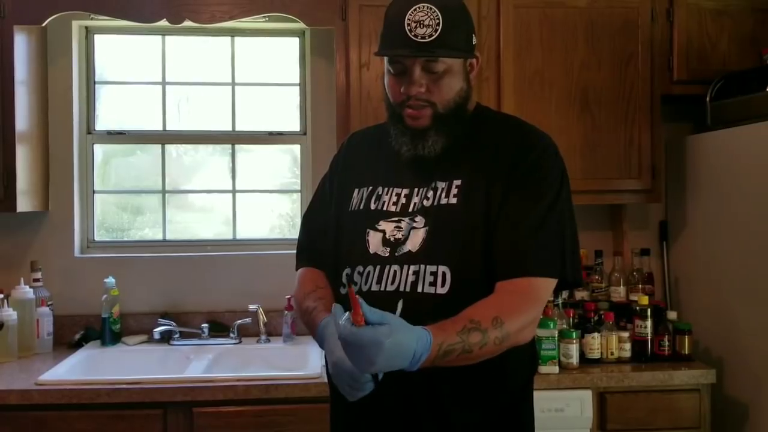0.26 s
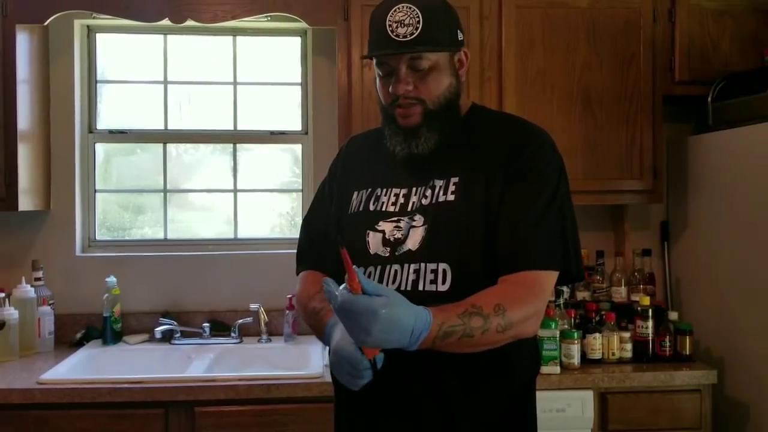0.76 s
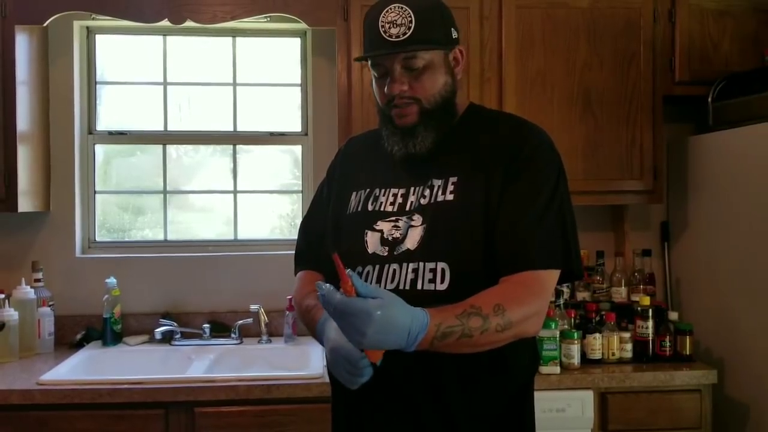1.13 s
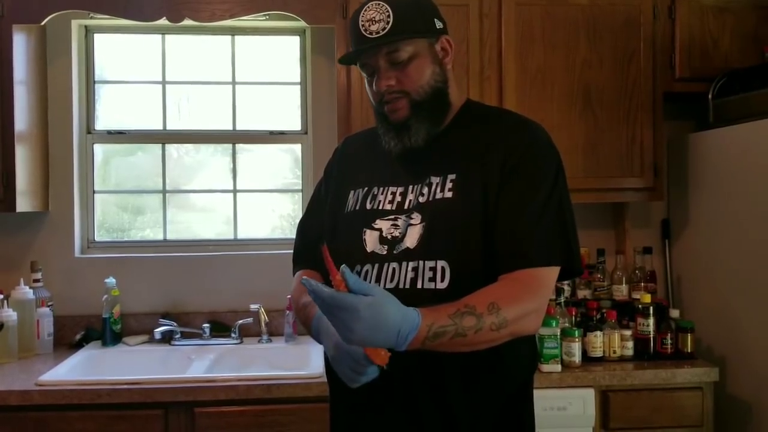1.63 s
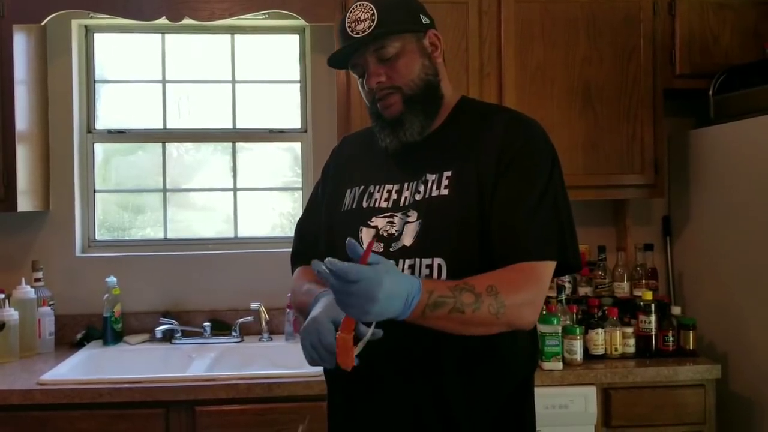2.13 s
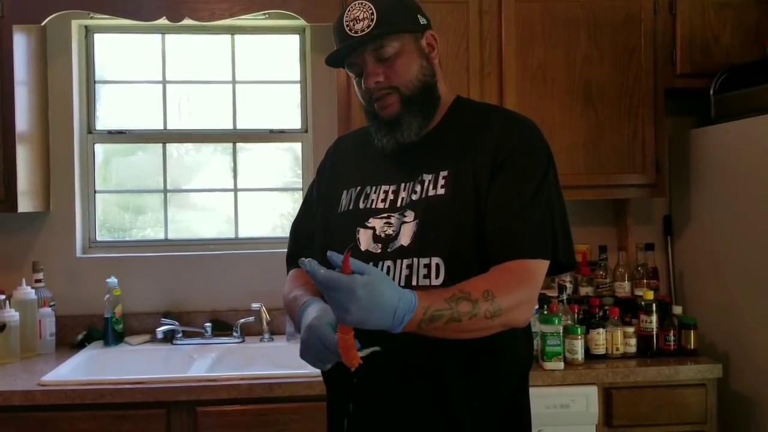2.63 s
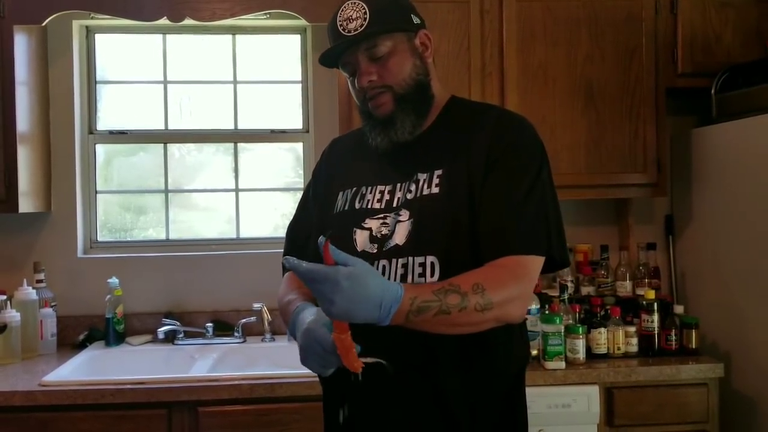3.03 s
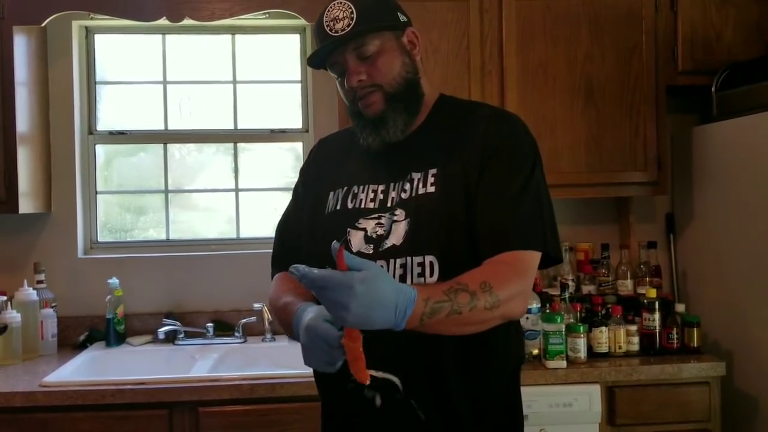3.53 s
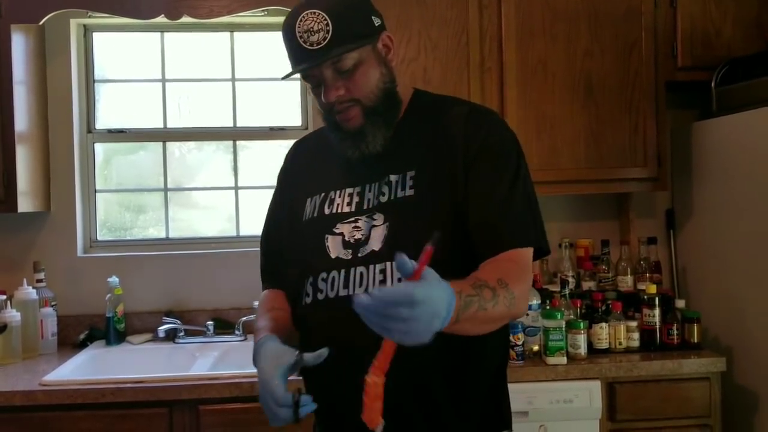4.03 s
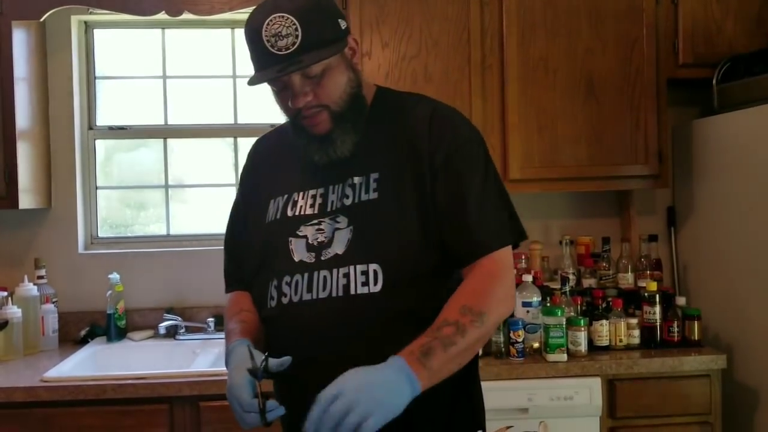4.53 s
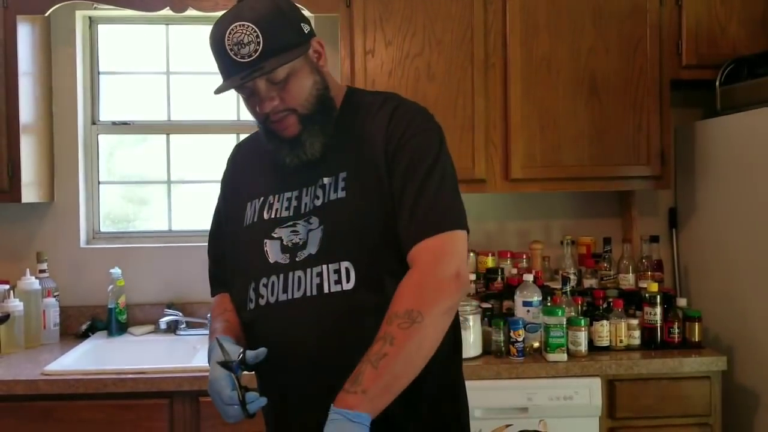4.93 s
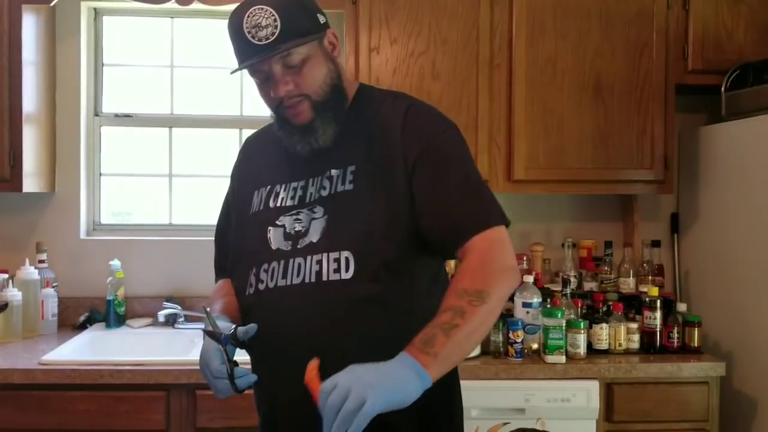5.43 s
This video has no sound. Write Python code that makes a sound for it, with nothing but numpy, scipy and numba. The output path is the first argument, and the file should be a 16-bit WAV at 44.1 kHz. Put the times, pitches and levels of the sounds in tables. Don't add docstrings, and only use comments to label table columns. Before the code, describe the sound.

A small, hard-walled kitchen with a quiet low fridge hum and faint hiss, heard in stereo from a few steps away. At first only soft glove rubbing and small ticks at about 0.3 and 0.6 s. A tearing crack comes at 0.84 s, then a bright, splintery grinding run from 1.07 to 1.17 s. Strong snaps follow at 1.57, 1.64 and 1.82 s, with gritty crunching between. A lower-pitched snap lands at 2.34 s, then lighter ticks and creaks until 3.1 s. Cracks thicken from 3.2 s, with brief hollow squeaks, peaking in a dense, loud cluster at 3.58 to 3.65 s; a last heavy bite falls at 3.88 s. After a near pause, a loud woody knock with a clatter hits the counter at 4.42 s. Pieces rattle and rock around 4.8 to 5.1 s, tap lightly near 5.3 s, and a final thud at 5.49 s fades into the hum.

```python
import sys
import numpy as np
from scipy import signal
from scipy.fft import rfft, irfft
from scipy.io import wavfile
from scipy.ndimage import uniform_filter1d
from numba import njit

SR = 44100
rng = np.random.default_rng(int(sys.argv[2]) if len(sys.argv) > 2 else 0)


def gain_from_db(level_db):
    decades = np.asarray(level_db, float) / 20
    return 10 ** decades


def store_pcm(level_fs):
    pcm = np.round(np.clip(level_fs, -1, 1) * 32767).astype(np.int16)
    wavfile.write(sys.argv[1], SR, np.atleast_2d(pcm).T)


N = 250488
T = np.arange(N) / SR
LEAD = 128
PLACES = 4

# (f/Hz, width/Hz, level/dB)
COUNTER = [(125, 86, -14), (204, 330, -0.5), (360, 240, 0.5), (426, 61, 9.5), (645, 35, 4), (832, 130, 4.5),
           (1250, 250, 0.5), (1543, 160, 3), (2050, 870, -9.5)]
# (f/Hz, density/dB)
TREBLE = [(2940, -29), (5000, -2.5), (5630, -3.5), (7170, -2), (8910, -7.5), (10600, -6.5), (12200, -4.5),
          (13900, -1), (14900, -4), (15500, -65)]


def unit(x):
    return x / np.sqrt(np.mean(x ** 2) + 1e-30)


def peak(x, db):
    return x * gain_from_db(db) / np.sqrt(uniform_filter1d(x ** 2, 128).max())


def add(out, s, x):
    i = int(s * SR) - LEAD
    out[i:i + len(x)] += x[:N - i]


def on_log(table, size):
    hz, value = np.transpose(table)
    return np.interp(np.log(np.fft.rfftfreq(size, 1 / SR) + 1), np.log(hz), value)


def colour(x, table):
    size = x.shape[-1]
    return irfft(rfft(x) * gain_from_db(on_log(table, size)), size)


def diffuse(size):
    # (f/Hz, correlation)
    alike = [(60, 0.84), (300, 0.8), (640, 0.47), (1400, 0), (15000, 0.21)]
    c = np.clip(on_log(alike, size), 0, 1)
    mid, side = rfft(rng.standard_normal((2, size)))
    mid = mid * np.sqrt((1 + c) / 2)
    side = side * np.sqrt((1 - c) / 2)
    return irfft(np.array([mid + side, mid - side]), size)


@njit
def svf(x, hz, q):
    y, b, l = np.empty(len(x)), 0., 0.
    for i in range(len(x)):
        g = np.tan(np.pi * hz[i] / SR)
        v = (b + g * (x[i] - l)) / (1 + g * (g + 1 / q))
        b, l, y[i] = 2 * v - b, l + 2 * g * v, v / q
    return y


def ring(x, hz, width_hz):
    return svf(x, np.full(len(x), 1. * hz), hz / width_hz)


def body(x, modes):
    return sum((-1) ** k * gain_from_db(db) * ring(x, hz, w) for k, (hz, w, db) in enumerate(modes))


def regrip(modes, spread):
    shifts = rng.standard_normal(len(modes)).clip(-2, 2)
    return [(hz * (1 + spread * shift), w, db) for (hz, w, db), shift in zip(modes, shifts)]


def swells(rows):
    t = T[::64]
    gain = 0
    for s, db, up, down in rows:
        gain = gain + gain_from_db(db) * np.exp(-np.abs(t - s) / np.where(t < s, up, down).clip(.002))
    return np.interp(T, t, gain)


def fractures(size, rate, spread_db):
    hit, big, sign = rng.random((3, size))
    return (hit < rate / SR) * gain_from_db(-spread_db * np.log(big + 1e-4)) * np.sign(sign - .5)


def burst(length_s, rate=14000, rise=0.72, brittle_s=0.0025):
    t = np.clip(np.arange(4096) - LEAD, 0, None) / SR / np.clip(length_s, .0003, .025)
    x = 0.38 * fractures(4096, rate, 3.7) * np.exp(-t) * (1 - np.exp(-t / rise))
    x[LEAD] += np.exp(-length_s / brittle_s)
    x = rfft(x)
    return irfft(x / np.sqrt(uniform_filter1d(np.abs(x) ** 2, size=40) + 1e-12))


def cracks():
    # (t/s, peak level/dB, shell resonance f/Hz, treble level/dB, low level/dB)
    snaps = [
        (1.0714, -30, 3730, 10.5, -35),
        (1.5699, -19, 3400, 2.5, -1.5),
        (1.6386, -19.5, 1150, -6.5, 1),
        (1.8221, -17, 2450, 1.5, 2.5),
        (2.3429, -21.5, 1090, -3.5, -23),
        (3.2715, -22.5, 1380, -24, -6),
        (3.581, -19.5, 2280, -1.5, -40),
        (3.596, -16.5, 2360, 0, -37),
        (3.878, -24, 2830, -8, 13.5),
    ]
    ticks = [(0.3322, -41.5, 1850, -12, 14), (0.596, -33.5, 4100, -8, -20.5), (0.626, -33, 3060, 8, -16),
             (0.6536, -31.5, 1530, -19, -22), (1.531, -34, 1810, -8, -9), (2.003, -42, 1530, 7.5, -20),
             (2.056, -39, 980, 1.5, 15), (2.2397, -48, 2160, 3.5, 13), (2.272, -41.5, 5060, 9.5, 14.5),
             (2.3109, -47, 1590, 12, 23), (2.493, -34.5, 765, -47, -20), (2.592, -39.5, 5230, 1, -20),
             (2.629, -37, 4830, -25, -7), (2.8526, -33.5, 4380, -5.5, 6), (3.0585, -35.5, 1160, -10, 7),
             (3.647, -17, 4900, -2, -20), (3.812, -37.5, 3430, -16.5, -21), (4.773, -51, 1500, 9, -3)]
    # (t/s, peak level/dB, f/Hz, treble level/dB)
    splinters = [
        (1.1237, -29, 3900, 4.5),
        (2.3431, -28, 3640, -15),
        (3.271, -36, 3170, -40),
        (3.281, -41, 3250, -28),
    ]
    tears = [(0.8339, -23, 3620, 4, 4.5), (0.8427, -23.5, 2540, 8.5, 6.5), (1.3393, -31.5, 3070, 1.5, 4),
             (1.5774, -28, 1250, 6, -30), (1.8338, -23.5, 3480, 3, 10), (1.8533, -23, 1500, -3.5, -32),
             (2.0292, -42.5, 1710, 6.5, 12), (2.9307, -46, 1870, -24, 21.5), (3.126, -33, 1150, -6.5, -21),
             (3.2993, -30.5, 3340, 2.5, 11.5), (3.4785, -37, 2340, -1, 14), (3.6394, -16, 2300, 1, -16)]
    # (t/s, peak level/dB, f/Hz, treble level/dB, tearing time/s)
    grinds = [(1.0888, -28, 3400, 4.5, 0.031), (1.1105, -30, 4260, -2, 0.012),
              (1.1346, -26.5, 2300, -8, 0.0065), (1.318, -33.5, 1780, -3.5, 0.012),
              (1.5449, -37, 1250, 3.5, 0.0084), (2.841, -41.5, 1490, -8, 0.0071),
              (2.3556, -31.5, 2640, -8, 0.0096), (2.6624, -39.5, 2600, 5, 0.0068),
              (2.706, -37.5, 3580, -0.5, 0.0075), (2.955, -41, 2300, 3.5, 0.016),
              (3.1733, -32, 2050, -2.5, 0.0031), (3.2757, -28, 1430, -22, 0.0058),
              (3.348, -32.5, 2340, -1, 0.0091), (3.499, -37, 2600, 1.5, 0.0054),
              (3.6143, -27.5, 1900, 5.5, 0.0054), (3.631, -32, 2190, -13, 0.015)]
    # (f/Hz, width/Hz, level/dB)
    leg_modes = [(1250, 270, -12), (2300, 125, 0.5), (3920, 260, -20), (5410, 220, -5)]
    snap_s, tick_s, splinter_s, tear_s = 0.0012, 0.0015, 0.0012, 0.0036
    thin_low_db = -36

    quick = sorted([(*c, snap_s) for c in snaps] + [(*c, tick_s) for c in ticks])
    quick += [(*c, thin_low_db, splinter_s) for c in splinters]
    slow = [(*c, tear_s) for c in tears] + [(*c[:4], thin_low_db, c[4]) for c in grinds]
    out = np.zeros((PLACES, N))
    for k, (s, db, hz, treble_db, low_db, length_s) in enumerate(quick + slow):
        x = burst(length_s)
        piece = ring(ring(x, hz, 0.5 * hz), hz, 0.66 * hz)
        leg = gain_from_db(5.5) * body(x, regrip(leg_modes, 0.173))
        leg = leg + gain_from_db(-4.0) * ring(ring(x, 2470, 4640), 2470, 4640)
        shell = peak(piece, 0) + peak(leg, 4.0 + 0.5 * treble_db)
        spray = colour(x, TREBLE)
        low = ring(ring(x, 1110, 1470), 550, 2200)
        place = k % 2 + 2 * (k >= len(quick))
        add(out[place], s, peak(shell, db) + peak(spray, db + treble_db) + peak(low, db + low_db - 13.0))
    return out


def blows():
    # (t/s, peak level/dB, f/Hz, sharpness Q)
    hard_blows = [(0.628, -35, 5500, 1.5), (0.85, -29.5, 960, 4.5), (0.86, -23.5, 1650, 4),
                  (0.8455, -25, 2700, 3.7), (1.085, -21.5, 5000, 0.92), (1.127, -20, 2200, 1.2),
                  (1.135, -23, 1800, 1.5), (1.153, -26, 2000, 4), (1.17, -26, 1800, 2),
                  (1.569, -24, 950, 3.9), (1.575, -20, 1280, 6.3), (1.639, -32, 1050, 4.1),
                  (1.646, -26, 1270, 3.3), (1.833, -18.5, 7200, 3), (1.859, -23, 1510, 4.3),
                  (2.3425, -18, 1040, 2.8), (2.343, -23, 2300, 7), (2.3435, -19.5, 3440, 6.3),
                  (2.344, -21, 4300, 5.1), (2.348, -21.5, 1520, 5.5), (3.272, -20, 3260, 4.4),
                  (3.2795, -21, 3200, 4.9), (3.301, -24, 3100, 1.1), (3.272, -29, 1500, 4),
                  (3.279, -28, 1450, 5.4), (3.187, -32, 2300, 9), (3.204, -34, 2250, 9),
                  (3.379, -27, 2520, 9.9), (3.41, -29, 2350, 9), (3.598, -16, 2070, 1.8),
                  (3.6515, -22, 4730, 1.5), (3.644, -29, 2450, 4), (3.8782, -27, 960, 2),
                  (3.88, -22.5, 1900, 1.6), (4.4265, -15, 810, 4.2), (4.426, -26.5, 170, 1.3),
                  (4.4113, -29, 1300, 1.1), (4.4245, -11, 463, 7.6), (4.426, -13, 2650, 7),
                  (4.424, -12.5, 1700, 8), (4.844, -17, 5950, 1.9), (4.9413, -33, 830, 1.5),
                  (5.2865, -40, 895, 2.5), (5.4893, -18, 370, 0.98), (5.49, -19, 1100, 2),
                  (5.4895, -18.5, 345, 2.8), (5.506, -28, 330, 2.7), (5.4977, -21, 320, 1.9),
                  (5.4935, -20.5, 1850, 3.6), (5.497, -23, 1140, 6.9)]
    more_blows = [(4.448, -18, 2050, 6.1), (4.47, -21, 464, 6), (4.8345, -20.5, 970, 3.5), (4.836, -25.5, 450, 5),
                  (4.8427, -27, 1140, 4), (4.9434, -31, 900, 3.5), (4.96, -27, 425, 4), (5.026, -35, 407, 4),
                  (5.352, -36, 480, 5.7), (5.369, -27.5, 477, 7), (5.063, -38, 900, 3)]
    out = np.zeros(N)
    jolt = 1. * (np.arange(2048) == LEAD)
    for s, db, hz, q in hard_blows + more_blows:
        width_hz = hz / np.clip(q, .5, 20)
        add(out, s, peak(ring(ring(jolt, hz, width_hz), hz, width_hz), db))
    return out


def crunch():
    # (t/s, crunch level/dB, treble over crunch level/dB, fade/s)
    bites = [(0.0, -49.5, 3, 0.017), (0.04, -63.5, 5.5, 0.63), (0.342, -58, 7, 0.045),
             (0.603, -38, -50, 0.028), (1.082, -32, -12, 0.048), (1.13, -47, 11.5, 0.036),
             (2.679, -42.5, 4.5, 0.039), (2.89, -54, -30, 0.049), (2.93, -49.5, 0, 0.081),
             (3.28, -49.5, 12.5, 0.039), (3.38, -36, 1.5, 0.027), (3.5, -56, 9, 0.047),
             (3.6, -50, 0, 0.043), (3.882, -36.5, -16, 0.029)]
    # (t/s, crunch level/dB, treble over crunch level/dB, swell/s, fade/s)
    rubs = [(0.98, -44, -1.5, 0.026, 0.053), (1.3, -50.5, -20.5, 0.11, 0.026), (1.51, -56, -7, 0.52, .12),
            (1.68, -52, -16, 0.11, 0.059), (1.98, -56.5, 0.5, 0.33, 0.083),
            (2.32, -45.5, 0.5, 0.031, 0.053), (2.45, -50, -23, 0.13, 0.08), (2.83, -53, -4, 0.2, 0.017),
            (3.188, -35, 0, 0.028, 0.01), (3.55, -47.5, -11, 0.11, 0.085), (3.82, -46.5, -3, .12, 0.054),
            (4.15, -60, -5.5, 0.048, 0.027), (4.368, -68, 19.5, 0.032, 0.0063)]
    # (t/s, level/dB, f/Hz, swell/s, fade/s)
    hollows = [(0.34, -43.5, 2020, 0.026, 0.17), (0.6, -68.5, 3090, 0.0098, 0.054),
               (0.839, -101.5, 2960, .006, 0.04), (1.13, -23, 2530, 0.011, 0.045),
               (1.33, -57, 2580, .03, 0.028), (1.57, -26, 3200, 0.012, 0.052),
               (1.68, -28.5, 2640, 0.062, 0.017), (1.84, -47, 2690, 0.1, 0.25),
               (2.35, -49, 3170, 0.027, 0.085), (2.45, -51, 2250, 0.091, 0.055),
               (2.68, -48, 2850, .04, 0.06), (2.85, -35, 2980, .005, 0.0072),
               (2.93, -36, 1970, 0.015, 0.027), (3.19, -22.5, 2190, 0.034, 0.0078),
               (3.28, -16, 3080, 0.014, 0.02), (3.38, -19, 2140, 0.014, 0.019),
               (3.5, -37, 2570, .011, .023), (3.6, -3, 2070, 0.0053, 0.019)]
    # (t/s, level/dB, swell/s, fade/s)
    glides = [
        (0.03, -58.5, 0.07, 0.096),
        (0.14, -56.5, 0.11, 0.046),
    ]
    # (f/Hz, width/Hz, level/dB)
    glove = [(2500, 500, 0), (4330, 300, 2)]

    bite_s = 0.0038
    work = [(s, db, rel, bite_s, fade) for s, db, rel, fade in bites] + rubs
    x = fractures(N, 6000, 2.8)

    s, _, hz = np.transpose(hollows)[:3]
    hz = np.interp(T, s, hz)
    hollow = unit(svf(svf(x, hz, 1.8), hz, 1.7))
    hollow = swells([(s, db - 18.0, up, down) for s, db, _, up, down in hollows]) * hollow

    broad = unit(ring(ring(x, 1750, 3900), 1750, 5200))
    broad = swells([(s, db - 2.0, up, down) for s, db, _, up, down in work]) * broad
    hiss = swells(glides) * unit(body(x[::-1].copy(), glove))
    treble = swells([(s, db + rel, up, down) for s, db, rel, up, down in work]) * unit(colour(x, TREBLE))
    return hollow + broad + hiss + treble


def patches(rows, q, grains):
    out = np.zeros(N)
    before = 3072
    t = (np.arange(8192) - before) / SR
    for s, db, hz, up, down in rows:
        i = int(s * SR) - before
        swell = np.exp(-np.abs(t) / np.where(t < 0, up / 2, down).clip(.0003, .03))
        x = grains[i:i + len(t)] * swell[:N - i]
        out[i:i + len(x)] += peak(ring(ring(x, hz, hz / q), hz, hz / q), db)
    return out


def squeaks():
    # (t/s, level/dB, f/Hz, swell/s, fade/s)
    walls = [(1.808, -41, 1250, 0.026, 0.02), (2.415, -42.5, 2150, 0.022, 0.033),
             (2.71, -44, 3550, .005, .03), (2.52, -53, 2800, 0.027, 0.024), (3.08, -44, 1830, .004, 0.0085),
             (0.345, -48, 1670, .006, 0.012), (2.61, -56, 2850, .03, .03), (3.129, -41, 1150, 0.0028, .006),
             (3.138, -37, 1850, 0.0037, 0.006), (3.19, -34, 2300, 0.043, 0.011),
             (3.195, -42, 4200, 0.024, .015), (3.277, -38, 1450, .003, 0.0066),
             (3.378, -32, 2530, .004, .012), (3.395, -35.5, 2340, .01, .012),
             (3.412, -46, 2450, .006, 0.013), (3.565, -39, 2580, .004, 0.0056),
             (3.6, -30, 2300, 0.0033, 0.0078), (3.612, -32, 2560, .008, .015),
             (3.63, -44, 2250, .01, 0.009), (3.645, -41, 2300, .006, 0.016), (3.65, -36, 4800, .01, .025),
             (3.6, -24.5, 4770, .003, .01), (3.815, -44, 3500, .002, .004)]
    chips = [(3.28, -26.5, 3250, 0.00088, .004), (3.3, -38, 3500, .002, 0.0027),
             (3.879, -37, 1510, 0.00039, 0.0038), (3.88, -32, 3560, .0005, 0.0021),
             (4.823, -35, 1990, 0.0011, 0.0026), (4.836, -32, 1040, 0.0013, 0.0043),
             (4.844, -39, 2780, .002, 0.0034), (4.846, -40, 1090, .002, 0.0046),
             (4.447, -23, 1890, 0.0032, .006), (5.365, -49, 2490, .006, .01), (5.405, -50, 1900, .006, .01),
             (5.503, -42, 1130, 0.0025, 0.0053), (5.495, -36, 1900, .001, 0.0049)]
    rocks = [(4.855, -40, 263, .01, .01), (4.878, -44, 620, 0.0065, .01), (4.91, -36, 620, .006, .015),
             (4.93, -39, 437, 0.012, .01), (4.945, -35, 880, .003, 0.014), (4.962, -42, 440, 0.0056, 0.019),
             (4.99, -49, 750, .01, 0.018), (5.025, -49, 483, .006, 0.0072),
             (5.066, -42, 380, 0.0065, 0.009), (5.325, -50, 700, .005, .01),
             (5.385, -42, 480, 0.006, 0.016), (5.39, -45, 453, .005, 0.012), (5.415, -41, 402, .008, 0.016),
             (5.442, -41.5, 500, 0.011, 0.013), (5.54, -33, 500, 0.008, 0.0071)]
    x = fractures(N, 9000, 2.5)
    return patches(walls, 6, x) + patches(chips, 1.95, x[::-1].copy()) + patches(rocks, 2.1, x)


def drops():
    # (t/s, peak level/dB, knock f/Hz, click level/dB, treble level/dB)
    knocks = [(4.424, -11, 441, -3, -25), (4.831, -22.5, 224, 3.5, 1.5), (4.94, -26.5, 704, -13, -17),
              (5.033, -43, 980, -5, -30), (5.062, -39, 1000, -18, -36), (5.098, -34, 970, -6.5, -17),
              (5.286, -39.5, 360, -29, -14), (5.318, -35.5, 503, -33, -15), (5.352, -31.5, 480, -50, -12.5),
              (5.394, -38, 480, -15, -20), (5.4903, -16.5, 323, -5.5, -4.5)]
    tumbles = [(4.41, -19, 500, -7, -6.5), (4.427, -17.5, 468, -14, -10), (4.425, -14.5, 1910, -4, -15),
               (4.445, -26, 1980, -11, -23), (4.469, -22.5, 360, -22, -29), (4.821, -33, 470, -17, -13),
               (4.845, -27.5, 215, -27, -21), (4.899, -31, 527, -13, -20), (4.954, -34, 388, -22, -16),
               (5.37, -47, 490, -7, -31), (5.418, -39, 394, -31, -19), (5.492, -22.5, 1170, -3.5, -15),
               (4.941, -29.5, 1080, -8.5, -16), (4.962, -38, 960, -18, -23), (5.351, -32.5, 204, -36, -28),
               (5.434, -51, 880, -3, -27)]
    knock_s, tumble_s = 0.0012, 0.0053
    out = np.zeros((PLACES, N))
    for k, (s, db, hz, click_db, treble_db) in enumerate(knocks + tumbles):
        tumbling = k >= len(knocks)
        x = burst(tumble_s if tumbling else knock_s)
        top = body(x, regrip(COUNTER, .02))
        knock = peak(ring(ring(x, hz, 0.14 * hz), hz, 1.1 * hz), 0) + peak(top, 3.0 + 0.35 * click_db)
        click = ring(ring(x, 1700, 2700), 4100, 4500)
        spray = colour(x, TREBLE)
        hit = peak(knock, db) + peak(click, db + click_db) + peak(spray, db + treble_db)
        add(out[k % 2 + 2 * tumbling], s, hit)
    return out


def shuffle():
    # (t/s, rumble level/dB, scratch over rumble level/dB, swell/s, fade/s)
    slides = [(4.37, -70, 14, 0.061, 0.02), (4.424, -8, -48, 0.0022, 0.012),
              (4.47, -29.5, -18, 0.018, 0.084), (4.773, -35, -19.5, .002, 0.11),
              (4.9, -28.5, -31, 0.035, 0.065), (4.945, -28, -25, 0.005, 0.044),
              (5.122, -41, -18, 0.05, 0.12), (5.288, -40, -23, .002, 0.09), (5.352, -40, -31, 0.0081, .036),
              (5.5, -20, -39, 0.0027, 0.018), (5.65, -65.5, 5.5, 0.099, .15)]
    x = fractures(N, 2500, 3.0)
    rumble = unit(unit(body(x, COUNTER)) + gain_from_db(8.0) * unit(ring(ring(x, 405, 290), 370, 380))
                  + gain_from_db(-6.5) * unit(ring(x, 1200, 350)) + gain_from_db(-3.5) * unit(ring(x, 184, 80)))
    scratch = unit(ring(ring(x, 2600, 3700), 2100, 3900))
    return (swells([(s, db - 10.5, up, down) for s, db, _, up, down in slides]) * rumble
            + swells([(s, db + rel, up, down) for s, db, rel, up, down in slides]) * scratch)


def kitchen(x, wet_db, first_s=0.0001, build_s=0.0011):
    # (f/Hz, T60/s)
    room_t60 = [(200, 0.33), (530, 0.27), (1400, 0.28), (3700, 0.29), (9700, 0.25), (15000, 0.2)]
    # (f/Hz, level/dB)
    room_wet = [(150, -9.5), (500, -5.5), (1150, -5.5), (2000, -1.5), (5000, -3), (13000, -2)]
    port_lag_s = 5e-5
    echo_s, echo_db = .0068, -16.5

    size = 2 ** 15
    t, noise, tail = np.arange(size) / SR, diffuse(size), 0
    t60_hz, t60_s = np.transpose(room_t60)
    for hz in 125 * 2. ** np.arange(0, 7, .5):
        t60 = np.interp(np.log(hz), np.log(t60_hz), t60_s)
        band = colour(noise, [(hz / np.sqrt(2), -60), (hz / 1.19, -3), (hz, 0),
                              (hz * 1.19, -3), (hz * np.sqrt(2), -60)])
        tail = tail + band * np.exp(-np.log(1000) * t / t60)
    tail = rfft(tail * np.clip((t - first_s) / build_s, 0, 1))
    power = np.abs(tail) ** 2
    tail = irfft(tail * np.sqrt(uniform_filter1d(power, size=900) / uniform_filter1d(power, size=90)))
    tail = tail * gain_from_db(wet_db) / np.sqrt(np.sum(tail ** 2) / 2)
    tail = colour(tail, room_wet)
    k = np.arange(33) - 16
    tail[0, :33] += np.sinc(k + port_lag_s * SR / 2)
    tail[1, :33] += np.sinc(k - port_lag_s * SR / 2)
    slap = int(echo_s * SR)
    tail[:, slap:slap + 33] += gain_from_db(echo_db) * np.sinc(k - np.array([[-3], [3]]))
    return signal.fftconvolve(x[None], tail[:, :size * 3 // 4], axes=1)[:, 16:N + 16]


def fridge():
    # (f/Hz, width/Hz, level/dB)
    wavering = [(89.3, 56, -59.5), (231.9, 5.9, -65.5), (274, 2.7, -67), (373.6, 4.2, -67),
                (703.4, 24, -71.5)]
    # (f/Hz, level/dB)
    motor = [(236.9, -63.5), (376.8, -64), (710.6, -70.5)]
    # (f/Hz, density/dB)
    air = [(12, -59), (20, -41), (44, -4.5), (133, -1), (153, -7), (238, -3.5), (342, -3.5), (382, -7),
           (581, -14), (705, -12), (1160, -25), (3540, -25), (8640, -43.5), (14300, -33.5), (15500, -46)]
    hum = sum(gain_from_db(db) * unit(ring(ring(rng.standard_normal(N), hz, w), hz, w)) for hz, w, db in wavering)
    hum = hum + sum(gain_from_db(db) * np.sqrt(2) * np.sin(2 * np.pi * hz * T) for hz, db in motor)
    return hum + gain_from_db(-54.5) * unit(colour(diffuse(N), air))


def scene():
    place_wet_db = [2.5, 3.0, 5.0, 5.5]
    hits = gain_from_db(-8.5) * (cracks() + drops())
    near = sum(kitchen(x, wet_db) for x, wet_db in zip(hits, place_wet_db))
    handling = kitchen(gain_from_db(-6.0) * (crunch() + shuffle() + squeaks()), 2.7)
    return near + handling + fridge() + kitchen(gain_from_db(-10.5) * blows(), -0.7)


def band_limit(x):
    return signal.sosfilt(signal.butter(12, 15820, fs=SR, output="sos"), x)


def record(dry):
    # (f/Hz, level/dB)
    port_tilt = [(100, 0.65), (500, 0.75), (1000, -0.84), (4000, 0.26), (8000, 1.5), (13000, -2.5)]
    left = colour(dry[0], port_tilt)
    right = colour(dry[1], [(hz, -db) for hz, db in port_tilt])
    top_cut = signal.butter(6, 13700, fs=SR, output="sos")
    return band_limit(signal.sosfilt(top_cut, np.array([left, right])))


dry = scene()
out = record(dry)
store_pcm(out)
```